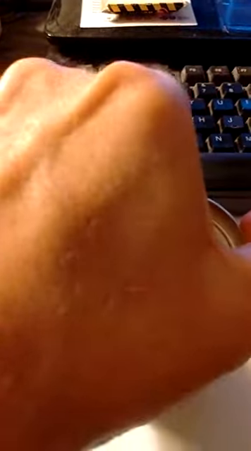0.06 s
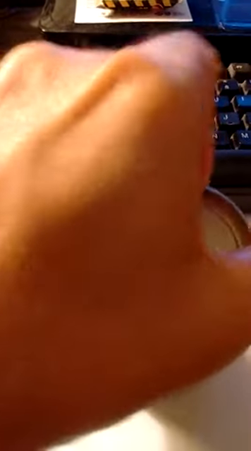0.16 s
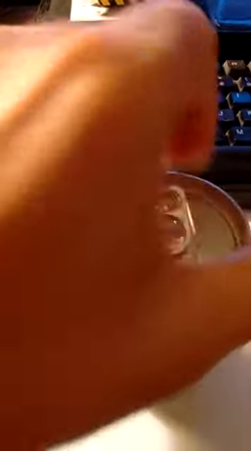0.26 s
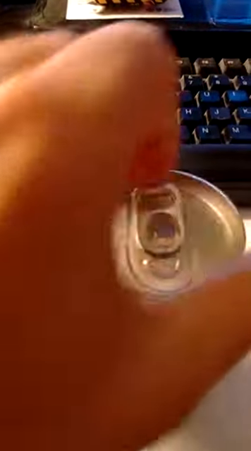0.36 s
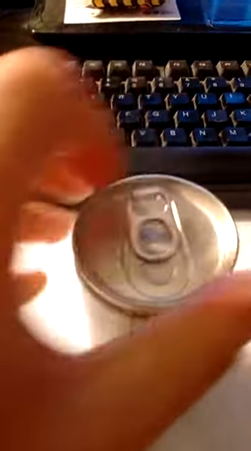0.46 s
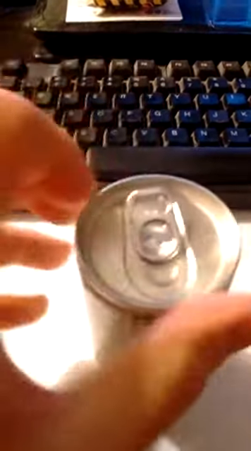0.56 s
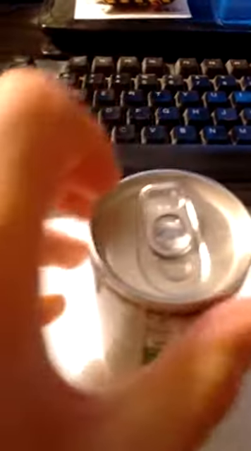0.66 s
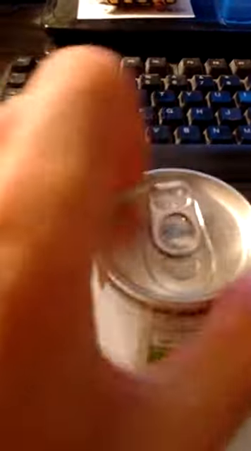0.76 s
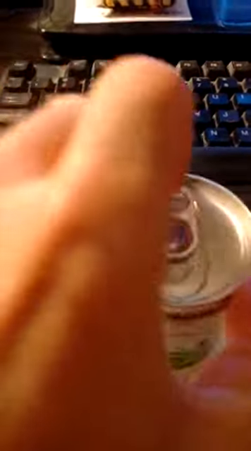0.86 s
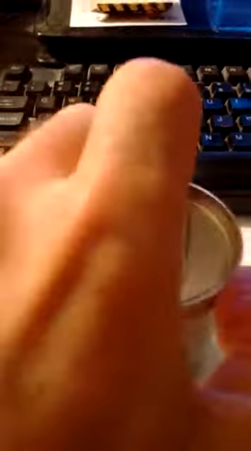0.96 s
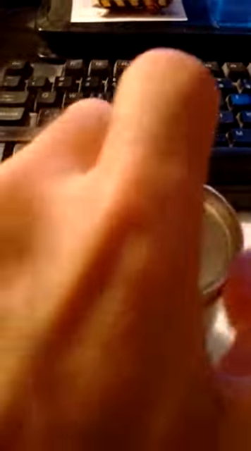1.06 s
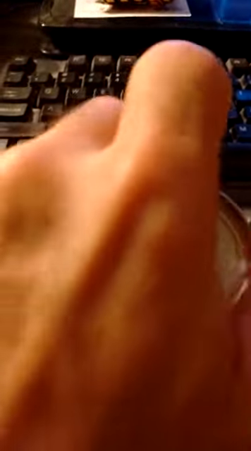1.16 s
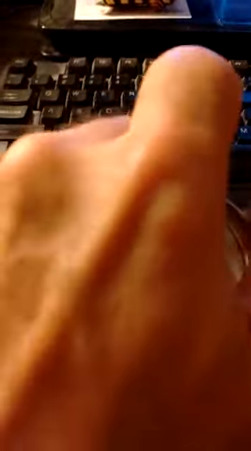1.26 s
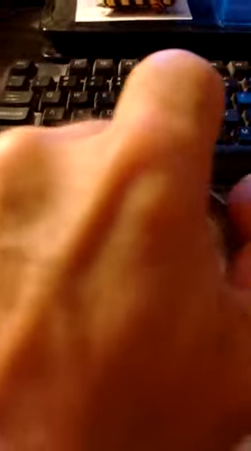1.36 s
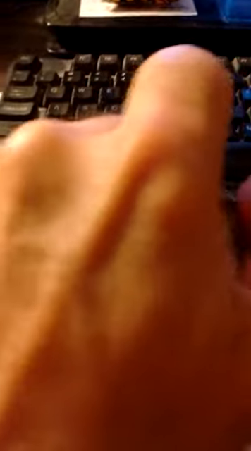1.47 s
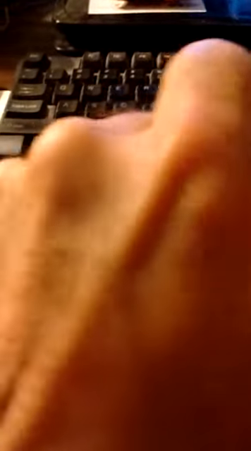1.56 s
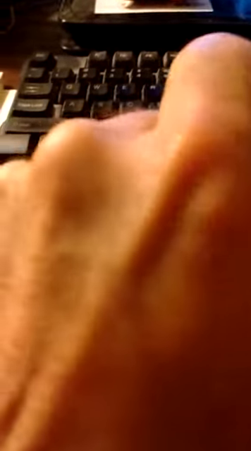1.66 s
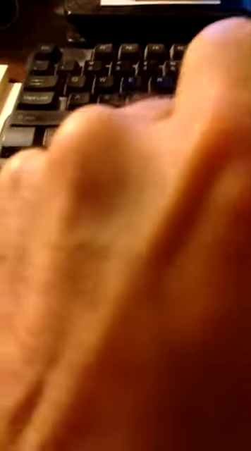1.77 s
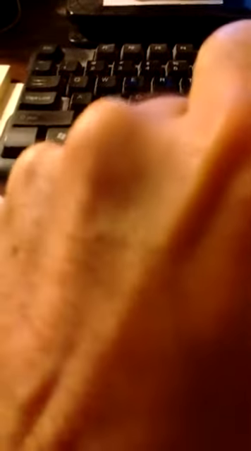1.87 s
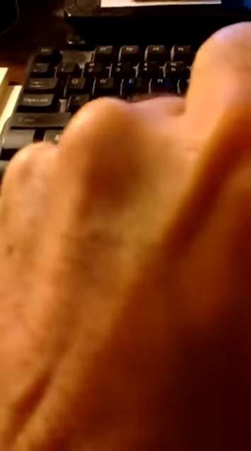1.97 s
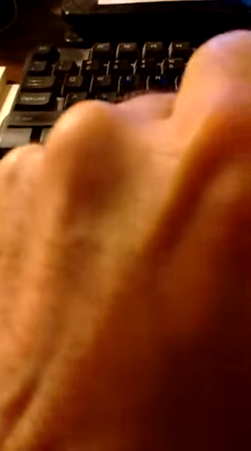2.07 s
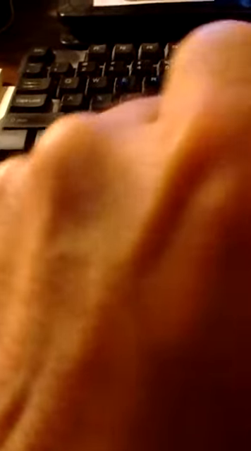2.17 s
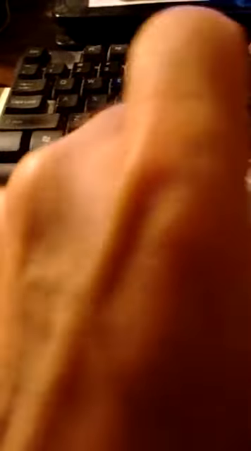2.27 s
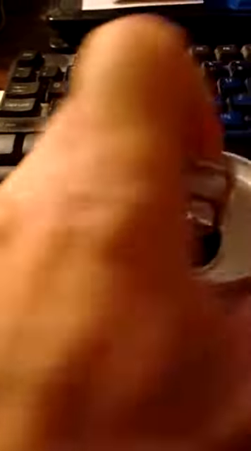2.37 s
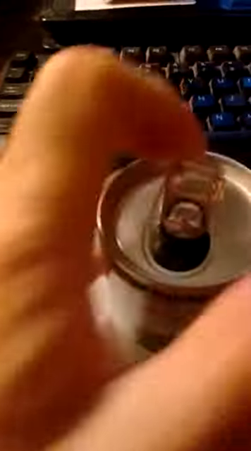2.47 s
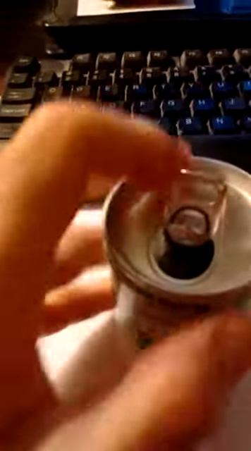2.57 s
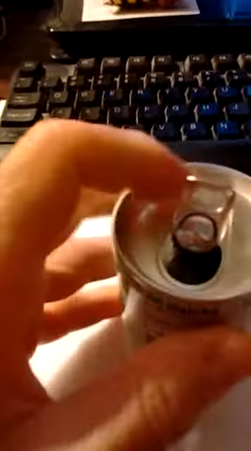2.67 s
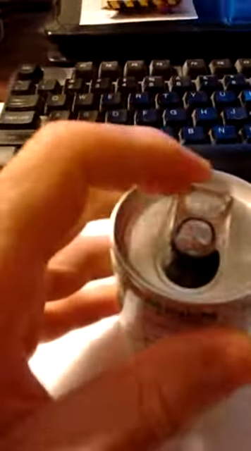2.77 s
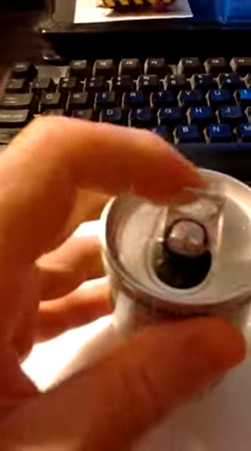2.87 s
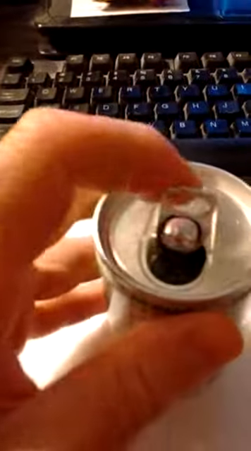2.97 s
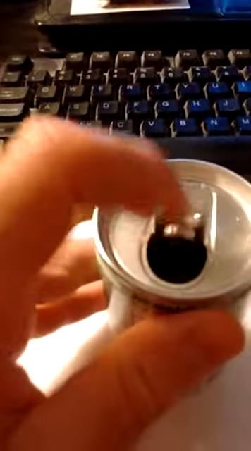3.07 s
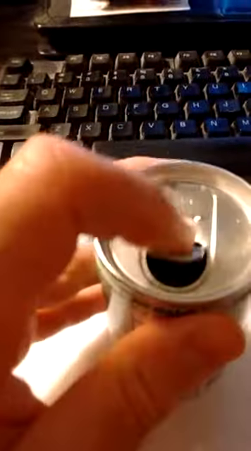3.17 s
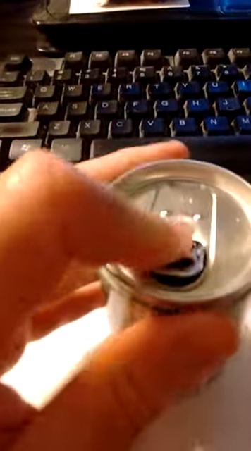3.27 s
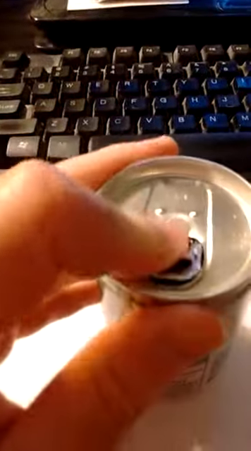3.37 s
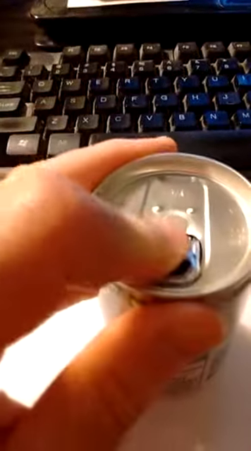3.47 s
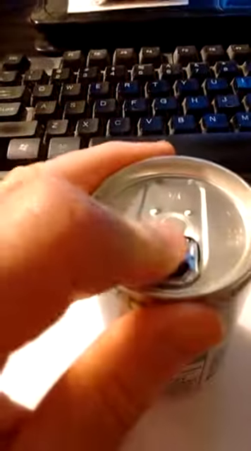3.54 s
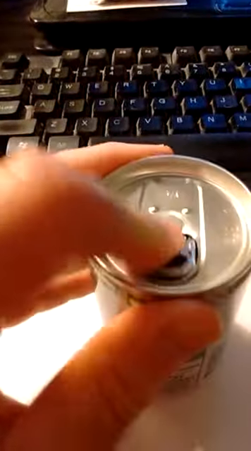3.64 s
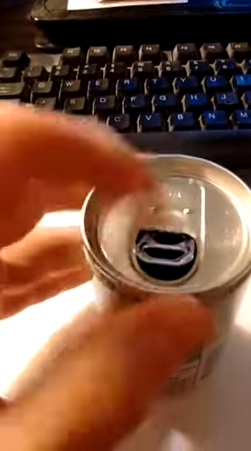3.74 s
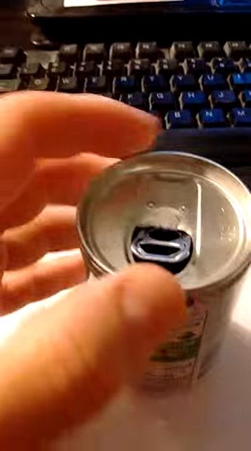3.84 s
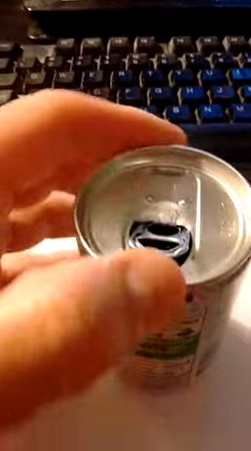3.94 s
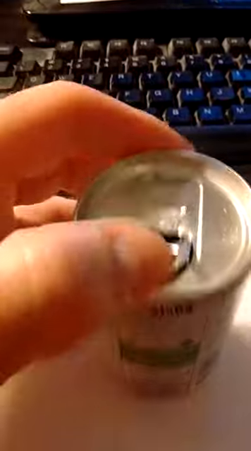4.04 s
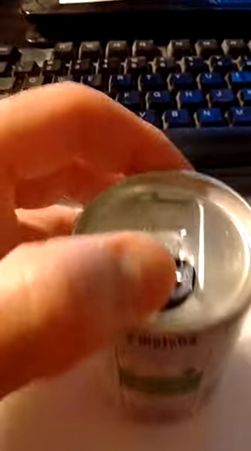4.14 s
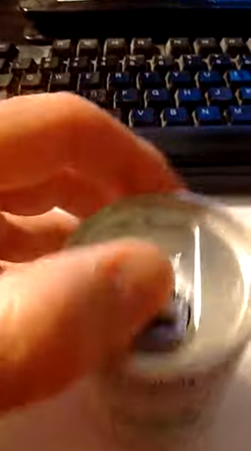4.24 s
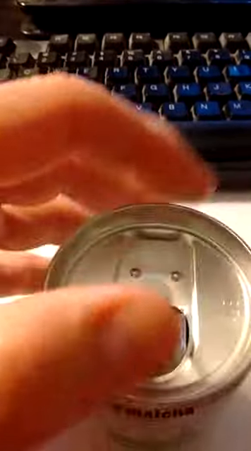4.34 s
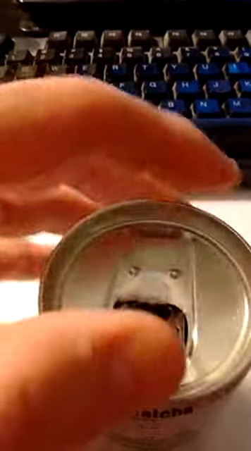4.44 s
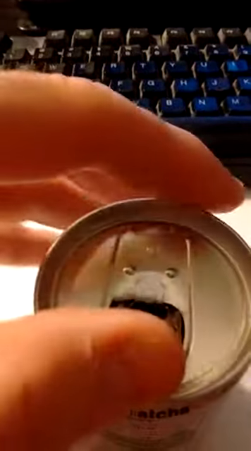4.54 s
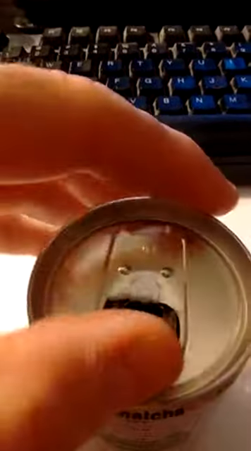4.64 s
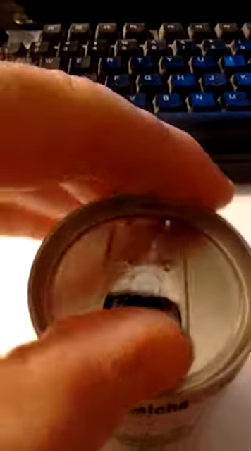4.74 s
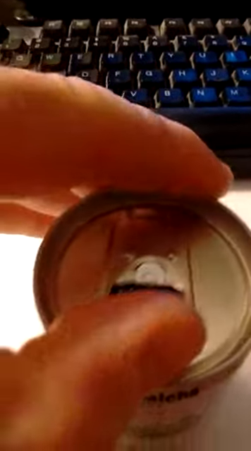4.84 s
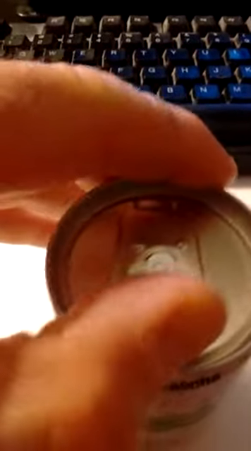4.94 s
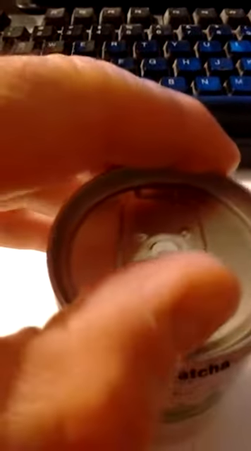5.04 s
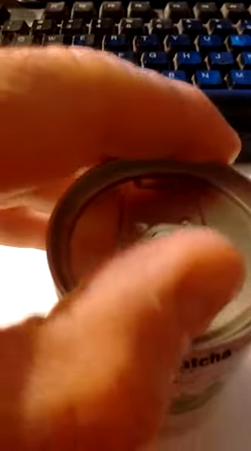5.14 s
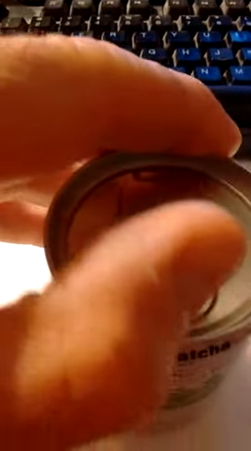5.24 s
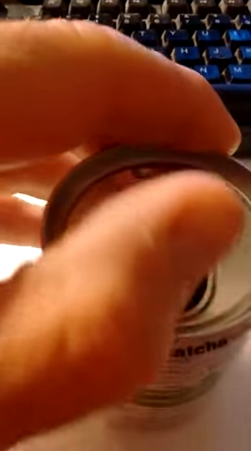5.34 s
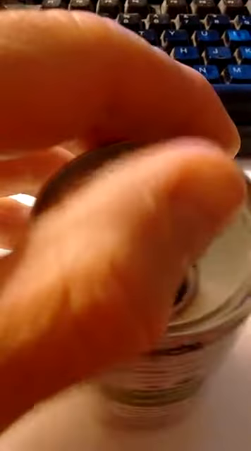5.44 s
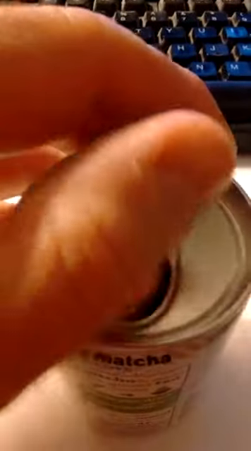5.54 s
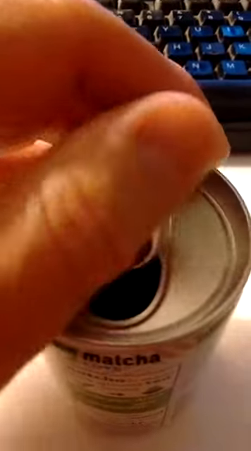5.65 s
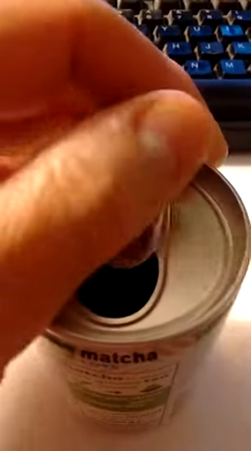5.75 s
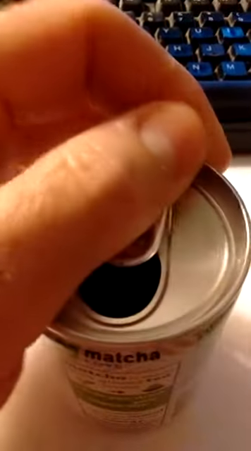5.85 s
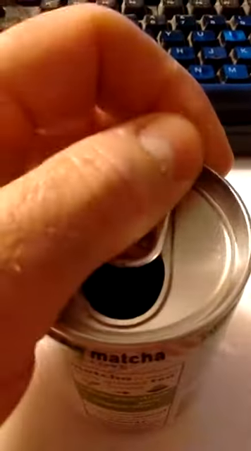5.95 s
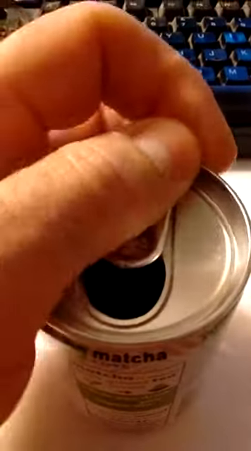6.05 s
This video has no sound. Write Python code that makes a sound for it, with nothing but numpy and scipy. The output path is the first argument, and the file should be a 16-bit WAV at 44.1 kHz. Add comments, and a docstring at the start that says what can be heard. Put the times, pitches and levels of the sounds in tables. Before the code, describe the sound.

Fingers fumble on an aluminium can with faint rubs, rim swipes and small clicks. A tiny creak leads into a sharp metallic snap with a dull pop, far louder than everything else. Light tab creaks follow, then a ping, a solid can thud with a short ringing drag, and a final scraping click. Very close phone pickup, little echo, low rumble and faint fan whine beneath, ducked after the snap.

```python
"""Skin rubs and nails tick on a small aluminium can, close by, over quiet room noise and a faint fan whine.
The lid snaps open, the can is set down and dragged, and the tab is bent flat and back.
Blows and slips ring decaying modes plus a noise crack; strokes are showers of slips coloured by a spectrum.
A phone's gain control ducks at the snap, and the room noise swells back over three seconds."""
import sys
import numpy as np
from scipy import signal
from scipy.fft import rfft, irfft, next_fast_len
from scipy.io import wavfile
from scipy.ndimage import uniform_filter1d, minimum_filter1d, map_coordinates

SR = 44100
rng = np.random.default_rng(int(sys.argv[2]) if len(sys.argv) > 2 else 0)


def file_out(sig):
    """Save sig as 16-bit WAV at sys.argv[1]."""
    # one column per channel
    cols = np.atleast_2d(sig).T
    # limit, then scale
    lim = np.clip(cols, -1, 1)
    pcm = np.round(lim * 32767).astype(np.int16)
    wavfile.write(sys.argv[1], SR, pcm)


N = 269406

# Fractures of the scored lid. Each row: start in seconds, relative peak in dB, tilt in dB per octave.
FRACTURES = [(2.0673, 2.5, 0), (2.06817, 1, 3), (2.0704, -9.5, 2.5)]
# Modes of the lid under the hand. Each row: frequency in Hz, relative level in dB, t60 in s before damping.
LID_MODES = [(1135, -6, 0.02), (1665, 5.5, 0.0063), (1803, 2.5, 0.015), (2330, 4, 0.0099),
             (2590, 3, 0.0094), (3030, -4, 0.018), (3960, -8.5, .012), (4490, -7, 0.0078),
             (4390, -2, 0.015), (5044, -13, 0.015), (6520, -20, 0.0057), (8253, -13.5, 0.013),
             (10630, -20, .008), (12200, -26, 0.01), (15110, -30, 0.0063)]
# Modes of the full can on the desk. Each row: frequency in Hz, relative level in dB, t60 in s before damping.
CAN_MODES = [(102, 0, .17), (170, -5, .12), (240, 7, 0.19), (330, -12, .08), (540, -14, .1), (715, -6, .06),
             (830, -4, 0.06), (1110, -10, .05), (1300, -9, .035), (1660, 0, .045), (1885, 2, .055)]


def amp(db):
    """Decibels to gain."""
    return 10 ** (np.asarray(db) / 20)


def unit(x):
    """x at rms 1."""
    return x / np.sqrt(np.mean(x ** 2) + 1e-20)


def along(points, hz):
    """(Hz, value) points read on a log frequency axis."""
    point_hz, values = np.transpose(points)
    return np.interp(np.log(hz + 1), np.log(point_hz + 1), values)


def wobble(knots_per_s, size=N):
    """A smooth random curve through normally distributed knots."""
    knots = rng.standard_normal(int(size * knots_per_s / SR) + 4)
    return map_coordinates(knots, [np.arange(size) * knots_per_s / SR])


def filtered(x, response):
    """x times a response of frequency in Hz."""
    n = x.shape[-1]
    padded = next_fast_len(n + 8192)
    spectrum = rfft(x, padded) * response(np.fft.rfftfreq(padded, 1 / SR))
    return irfft(spectrum, padded)[..., :n]


def slope(hz, tilt_db):
    """Gain of a tilt in dB per octave about 2 kHz, limited to -12..6 and flat beyond 200..9000 Hz."""
    octaves = np.log2(np.clip(hz, 200, 9000) / 2000)
    return amp(np.clip(tilt_db, -12, 6) * octaves)


def add(track, start_s, sound):
    """Mix a sound into a track."""
    part = track[round(start_s * SR):][:len(sound)]
    part += sound[:len(part)]


def ring(modes, tilt_db, scatter_db, damping, attack_s, crack_db, crack_t60_s):
    """One blow at peak 1: decaying strong modes, and a noise crack for the many weak ones between them."""
    hz, db, t60_s = np.transpose(modes)[:, :, None]
    t = np.arange(SR // 5) / SR
    size = amp(db + scatter_db * rng.standard_normal(hz.shape)) * slope(hz, tilt_db)
    sense = (-1) ** np.arange(len(hz))[:, None]  # neighbouring modes swing in opposite senses
    decay = amp(-60 * t * damping / t60_s)
    tones = np.sum(sense * size * decay * np.sin(2 * np.pi * hz * t), axis=0)

    def crack_response(f):
        span = 1 / (1 + (f / hz.max()) ** 4) / (1 + (hz.min() / (f + 1)) ** 4)
        return amp(along(np.array(modes)[:, :2], f)) * slope(f, tilt_db) * span

    crack = filtered(rng.standard_normal(len(t)), crack_response) * amp(-60 * t / crack_t60_s)
    x = (unit(tones) + amp(crack_db) * unit(crack)) * (1 - np.exp(-t / attack_s))
    return x / np.abs(x).max()


def blows(events, modes, scatter_db, damping, attack_s, crack_db, crack_t60_s):
    """Every contact rings the modes at new strengths."""
    track = np.zeros(N)
    for start_s, peak_db, tilt_db in events:
        blow = ring(modes, tilt_db, scatter_db, damping, attack_s, crack_db, crack_t60_s)
        add(track, start_s, amp(peak_db) * blow)
    return track


def strokes(rows, attack_s, release_s):
    """Each stroke swells, holds and dies away: its (s, dB) outline and its tilt."""
    depth_db = 40
    gestures = []
    for start_s, hold_s, db, tilt_db in rows:
        end_s = start_s + hold_s
        rise = [(start_s - attack_s, db - depth_db), (start_s, db)]
        fall = [(end_s, db), (end_s + release_s, db - depth_db)]
        gestures.append((rise + fall, tilt_db))
    return gestures


def friction(gestures, colour, slips_per_s, smooth, uneven_db, ring_t60_s, ring_db):
    """Tiny slips under uneven pressure ring the thin wall differently from spot to spot."""
    spots_per_s = 24.5
    track, t = np.zeros(N), np.arange(SR // 2) / SR
    wall_t = np.arange(SR // 20) / SR
    for outline, tilt_db in gestures:
        times_s, levels_db = np.transpose(outline)
        start_s = max(times_s[0], 0)
        slips = (rng.random(len(t)) < slips_per_s / SR) * rng.standard_normal(len(t))
        pressure = amp(uneven_db * wobble(107.6, len(t)))
        grain = (unit(slips) + smooth * rng.standard_normal(len(t))) * pressure
        walls = rng.standard_normal((2, len(wall_t))) * amp(-60 * wall_t / ring_t60_s)
        here, there = [signal.fftconvolve(grain, wall / np.linalg.norm(wall))[:len(t)] for wall in walls]
        spot = wobble(spots_per_s, len(t))
        grain = grain + amp(ring_db) * (np.cos(spot) * here + np.sin(spot) * there)
        sound = unit(filtered(grain, lambda hz: amp(along(colour, hz)) * slope(hz, tilt_db)))
        level = amp(np.interp(start_s + t, times_s, levels_db)) * (start_s + t < times_s[-1])
        add(track, start_s, sound * level)
    return track


def can():
    """All that the hand does to the can."""
    return snap() + ticks() + pings() + knocks() + swipes() + rubs() + slides() + bends()


def snap():
    """Fractures share the energy stored in the bent lid; the flap drops and the can is jolted."""
    # Dull pop of the air under the lid. Each row: frequency in Hz, level in dB, t60 in s.
    pop_modes = [(152, 8.5, .05), (494, 2, 0.027)]
    # Wall shimmer of countless weak modes. Each row: frequency in Hz, relative level in dB per Hz.
    wall_colour = [(300, -24.5), (800, -16), (1100, 2.5), (1600, -3.5), (2300, -7), (2800, -3), (3600, -7),
                   (4600, -12), (5600, -10), (7600, -15), (10000, -22), (15000, -28)]
    tear_rms_db, jolt_peak_db, jolt_tilt_db = -12, 0, -3
    shimmer_db, shimmer_t60_s = -4.5, .08
    start_s, t = FRACTURES[0][0], np.arange(SR // 10) / SR
    tear = blows(FRACTURES, LID_MODES, scatter_db=0, damping=1, attack_s=.0004, crack_db=-4, crack_t60_s=.022)
    body = blows([(start_s, jolt_peak_db, jolt_tilt_db)], CAN_MODES, scatter_db=.5, damping=0.98,
                 attack_s=.001, crack_db=-2.0, crack_t60_s=0.062)
    for hz, db, t60_s in pop_modes:
        add(body, start_s, amp(db - 60 * t / t60_s) * np.sin(2 * np.pi * hz * t))
    shimmer = unit(filtered(rng.standard_normal(len(t)), lambda hz: amp(along(wall_colour, hz))))
    add(body, start_s, amp(shimmer_db - 60 * t / shimmer_t60_s) * shimmer)
    return amp(tear_rms_db) * unit(tear) + body  # tear rms is over the whole track


def ticks():
    """Nail and tab click on the lid; creaks and crackle excite the same modes."""
    # Single clicks. Each row: start in seconds, peak in dB, tilt in dB per octave.
    clicks = [(.2756, -27.5, 6), (.395, -29, -13), (.8472, -21, 10), (1.0183, -27.5, 5), (1.2232, -30, -5),
              (1.2868, -38, 6), (1.356, -17, 0), (1.6795, -31, 1), (1.685, -31, 6), (1.8195, -33.5, 4),
              (2.037, -33, 5), (2.0585, -12.5, -3.5), (3.5065, -28, -15), (5.0618, -29, -9.5),
              (5.2057, -30, -15), (5.4515, -28, -11), (5.5158, -16, 3.5)]
    events = clicks + creaks() + crackle(count=8)
    return blows(events, LID_MODES, scatter_db=3, damping=1.5, attack_s=.0002, crack_db=-.5, crack_t60_s=.007)


def creaks():
    """The strained tab sticks and slips at an even pace, harder each time: (s, peak dB, tilt) of every slip."""
    # Runs of slips. Each row: first slip in seconds, gap in s, count, peak of the first slip in dB.
    runs = [(1.35, .017, 2, -25.5), (1.8964, .014, 2, -31), (1.9844, .018, 2, -31.5),
            (3.0746, .011, 3, -26.5), (3.138, .011, 3, -32.5), (5.2, .0184, 3, -27.5),
            (5.3582, .012, 2, -20)]
    slip_grows_db = 1.5
    sealed_tilt_db, open_tilt_db = -1, -13.5  # per octave: the lid is duller once slack
    opened_s = FRACTURES[0][0]
    slips = []
    for start_s, gap_s, count, peak_db in runs:
        tilt_db = sealed_tilt_db if start_s < opened_s else open_tilt_db
        for k in range(round(count)):
            slips.append((start_s + k * gap_s, peak_db + k * slip_grows_db, tilt_db))
    return slips


def crackle(count):
    """Faint slips at random moments, count per strain of the tab: (s, peak dB, tilt)."""
    # Fingers working at the tab. Each row: start in seconds, end in seconds.
    strains = [(1.801, 2.05), (5.829, 6.1)]
    mean_db, spread_db, tilt_db = -38.5, 3.5, -1
    return [(rng.uniform(start_s, end_s), rng.normal(mean_db, spread_db), tilt_db)
            for start_s, end_s in strains for _ in range(count)]


def pings():
    """The loose tab pings on the rim; the struck spot weakens the modes far from its favoured frequency."""
    # Strikes. Each row: start in seconds, peak in dB, favoured frequency in Hz.
    strikes = [(3.7575, -25.5, 3950), (3.757, -22, 1300), (3.7636, -18.5, 1300), (4.2558, -10.5, 2730),
               (4.383, -43, 1300), (4.404, -32, 3950), (4.4955, -29.5, 3950)]
    # Modes of the tab. Each row: frequency in Hz, level in dB before weakening, t60 in s before damping.
    tab_modes = [(1297, 5, 0.022), (1863, -15, .016), (2733, 6.5, 0.034), (3920, -3, 0.032),
                 (5420, -12, .03), (7470, -8, .018)]
    loss_db = 10  # per octave away from the favoured frequency
    track = np.zeros(N)
    for start_s, peak_db, spot_hz in strikes:
        modes = [(hz, db - loss_db * abs(np.log2(hz / spot_hz)), t60_s) for hz, db, t60_s in tab_modes]
        track += blows([(start_s, peak_db, 0)], modes, scatter_db=2, damping=0.82,
                       attack_s=.0005, crack_db=-11.5, crack_t60_s=.008)
    return track


def knocks():
    """The whole can rings and rocks back once; a soft fingertip leaves its upper modes still."""
    # Blows from fingers and desk. Each row: start in seconds, peak in dB, tilt in dB per octave,
    # highest frequency that the contact excites in Hz.
    contacts = [(0.277, -30.5, 6, 3000), (.851, -14.5, 0, 990), (1.019, -20.5, 1.5, 2500),
                (1.67, -25.5, -.5, 900), (4.124, -23.5, 6, 3000), (4.1371, -3, -.5, 3000),
                (4.583, -27, 5.5, 2980)]
    rebound_s, rebound_loss_db = 0.0039, 11.5
    track = np.zeros(N)
    for start_s, peak_db, tilt_db, top_hz in contacts:
        modes = [(hz, db - 10 * np.log10(1 + (hz / top_hz) ** 8), t60_s) for hz, db, t60_s in CAN_MODES]
        pair = [(start_s, peak_db, tilt_db), (start_s + rebound_s, peak_db - rebound_loss_db, tilt_db)]
        track += blows(pair, modes, scatter_db=1.5, damping=1, attack_s=.001, crack_db=-10, crack_t60_s=.11)
    return track


def swipes():
    """A fingertip glides along the rim: dense slips with a steady noise part."""
    # Glides. Each row: start of hold in seconds, hold in s, level in dB, tilt in dB per octave.
    glides = [(.399, 0.089, -41, 3), (.868, 0.064, -32, 0), (.94, 0.037, -32, -2.5),
              (1.206, 0.023, -37, 0.5)]
    # Friction colour. Each row: frequency in Hz, relative level in dB per Hz.
    rim_colour = [(240, 10), (500, -14), (800, -4), (1150, 1.5), (1600, -9), (2100, -10), (3300, -7),
                  (3850, -8.5), (4450, -0.5), (5100, -17), (6800, -13), (7450, -14), (8200, -24),
                  (9300, -3.5), (10500, -35), (15000, -35)]
    gestures = strokes(glides, attack_s=0.016, release_s=0.057)
    return friction(gestures, rim_colour, slips_per_s=6000, smooth=1, uneven_db=1, ring_t60_s=.01, ring_db=-10)


def rubs():
    """Dry skin strokes the can: sparser, more uneven slips."""
    # Strokes. Each row: start of hold in seconds, hold in s, level in dB, tilt in dB per octave.
    skin_strokes = [(.185, 0.031, -31.5, 0.5), (.25, 0.044, -37.5, -2.5), (1.288, .003, -38, 1),
                    (1.68, 0.011, -36, 0), (1.712, 0.036, -35.5, 0.5), (1.752, 0.012, -31, 0.5),
                    (2.305, .044, -42.5, 1.5), (3.83, 0.032, -50.5, 6), (4.76, 0.0096, -52.5, 7),
                    (4.952, 0.019, -49.5, 6)]
    # Friction colour. Each row: frequency in Hz, relative level in dB per Hz.
    skin_colour = [(100, -6.5), (250, -13.5), (500, -51), (1100, -20), (1900, -24), (3000, -24),
                   (4000, -27), (5450, -26), (6500, -37.5), (8500, -33), (10800, -40.5), (15000, -52)]
    gestures = strokes(skin_strokes, attack_s=0.035, release_s=0.07)
    return friction(gestures, skin_colour, slips_per_s=1400, smooth=.4, uneven_db=1.8,
                    ring_t60_s=.012, ring_db=-3)


def slides():
    """Metal slides, tab on lid and can on desk, ringing the wall as it slips."""
    # Short slides. Each row: start of hold in seconds, hold in s, level in dB, tilt in dB per octave.
    short_slides = [(3.756, .012, -35.5, 0.5), (4.119, 0.011, -32.5, 3.5), (4.496, 0.0045, -37, -4),
                    (4.604, 0.028, -34, -3)]
    # Can dragged over the desk. Each row: time in seconds, level in dB before drag_db.
    drag = [(4.16, -62), (4.2, -53), (4.218, -42), (4.232, -31), (4.244, -36.5), (4.256, -35), (4.268, -40),
            (4.308, -42.5), (4.325, -56.5), (4.346, -46.5), (4.4, -49.5), (4.425, -80)]
    # Friction colour. Each row: frequency in Hz, relative level in dB per Hz.
    slide_colour = [(120, -8), (250, -7), (500, -37), (1050, -5.5), (1350, -10), (1750, -1), (2200, -8),
                    (2720, 3), (3200, -4.5), (3900, -8), (4800, -21.5), (6300, -8.5), (7100, -23),
                    (8400, -10), (9500, -21.5), (12000, -32.5), (15000, -31)]
    drag_db, drag_tilt_db = 13, 0.5
    gestures = strokes(short_slides, attack_s=0.008, release_s=0.046)
    gestures.append(([(s, db + drag_db) for s, db in drag], drag_tilt_db))
    return friction(gestures, slide_colour, slips_per_s=2800, smooth=.55, uneven_db=1,
                    ring_t60_s=.02, ring_db=-5)


def bends():
    """The tab grates lightly round its rivet and is levered back upright."""
    # Grating. Each row: start of hold in seconds, hold in s, level in dB, tilt in dB per octave.
    grates = [(3.085, 0.024, -39, -0.5), (3.135, 0.017, -37, -2), (4.74, 0.011, -46.5, -7),
              (5.195, 0.01, -39.5, -8), (5.88, 0.079, -44, -2)]
    # Tab levered upright. Each row: time in seconds, level in dB before lever_db.
    lever = [(5.385, -58), (5.41, -42), (5.44, -35), (5.482, -25.5), (5.499, -25.5), (5.512, -30),
             (5.518, -24.5), (5.528, -39), (5.547, -38), (5.58, -67)]
    # Friction colour. Each row: frequency in Hz, relative level in dB per Hz.
    bend_colour = [(200, -30), (750, -35), (1050, -7), (1350, 1.5), (1800, 0), (2100, -7), (2700, -6.5),
                   (3800, -9.5), (4900, -29.5), (6100, -12.5), (8000, -30.5), (9800, -18.5), (12000, -41),
                   (15000, -32)]
    lever_db, lever_tilt_db = 1, -1.5
    gestures = strokes(grates, attack_s=0.04, release_s=0.067)
    gestures.append(([(s, db + lever_db) for s, db in lever], lever_tilt_db))
    return friction(gestures, bend_colour, slips_per_s=3000, smooth=1, uneven_db=1.2,
                    ring_t60_s=.01, ring_db=-10)


def room(x):
    """The walls answer each microphone with its own short decaying noise tail."""
    # Room decay. Each row: frequency in Hz, t60 in s.
    room_decay = [(150, .16), (1200, .23), (2500, .19), (4500, .18), (8500, .17), (13000, .14)]
    hz, t, bins = signal.stft(rng.standard_normal((2, SR // 2)), SR, nperseg=256)
    decay = amp(-60 * t / along(room_decay, hz)[:, None])
    tail = signal.istft(bins * decay, SR, nperseg=256)[1]
    tail = np.pad(tail / np.linalg.norm(tail[0]), ((0, 0), (SR // 250, 0)))  # 4 ms pre-delay
    return signal.fftconvolve(x[None], tail, axes=1)[:, :N]


def background():
    """Steady rumble and air noise, with a low hum and a slightly unsteady fan whine."""
    # Room noise. Each row: frequency in Hz, relative level in dB per Hz.
    air_colour = [(25, -9), (55, 3), (85, -10.5), (120, -1.5), (250, -9), (400, -9.5), (800, -21),
                  (1050, -20), (1800, -23), (2600, -30.5), (4800, -37.5), (6500, -43), (9000, -36.5),
                  (15000, -46)]
    # Left-right likeness of the noise. Each row: frequency in Hz, coherence.
    likeness = [(500, 0.98), (850, 0.59), (1400, 0.46), (2500, 0.85), (5000, 0.53), (9000, 0.86),
                (13000, 0.073)]
    # Hum and whine tones. Each row: mean frequency in Hz, nominal rms in dB.
    steady_tones = [(56, -49.5), (119, -48.5), (1020, -55.5)]

    def shared_and_opposed(hz):
        turn = np.arccos(np.clip(along(likeness, hz), -1, 1)) / 2
        return amp(along(air_colour, hz)) * [np.cos(turn), np.sin(turn)]

    both, apart = filtered(rng.standard_normal((2, N)), shared_and_opposed)
    air = amp(-37.5) * unit(np.array([both + apart, both - apart]))
    tones = np.zeros(N)
    for hz, rms_db in steady_tones:
        level = amp(rms_db + 1.4 * wobble(4.8)) * np.sqrt(2)
        cycles = np.cumsum(hz + 1.5 * wobble(19)) / SR
        tones += level * np.sin(2 * np.pi * cycles)
    return air + tones


def microphones(pair):
    """The phone's stereo pair: opposite polarity in the bass, the left side leading in the treble."""
    def phase(hz):
        bass = np.pi * (1.5 + .5 * np.tanh((hz - 850) / 130))
        lag_s = .000325
        return bass + 2 * np.pi * lag_s * np.maximum(hz - 1600, 0)
    return filtered(pair, lambda hz: np.array([np.ones_like(hz), np.exp(-1j * phase(hz))]))


def scene():
    """The can, close and a little to the left, in the room."""
    # The left microphone is nearer. Each row: frequency in Hz, left minus right in dB.
    balance = [(200, 1.5), (850, 2), (1300, 2), (2600, 4), (3700, 8.5), (4600, 5), (7000, 4.5), (9800, 3.5),
               (12000, 14.5), (15000, 10)]
    direct = can()
    walls = filtered(room(direct), lambda hz: slope(hz, tilt_db=0.55))
    near = filtered(direct + amp(-22.5) * walls, lambda hz: amp(np.outer([.5, -.5], along(balance, hz))))
    return microphones(near + amp([[.7], [-.7]]) * background())


def gain_control(x, ceiling_db, start_db, hold_s, recovery_db_per_s):
    """Power over the ceiling cuts the gain at once; it waits, then climbs steadily. It starts turned down."""
    t, hold = np.arange(N) / SR, 2 * int(hold_s * SR / 2) + 1
    power = np.abs(uniform_filter1d(np.mean(x ** 2, axis=0), size=176))  # 4 ms mean
    needed_db = np.minimum(0, ceiling_db - 10 * np.log10(power + 1e-12))
    held_db = minimum_filter1d(needed_db, hold, origin=hold // 2)
    held_db[0] = start_db
    climb_db = recovery_db_per_s * t
    gain_db = np.minimum.accumulate(held_db - climb_db) + climb_db
    return x * amp(gain_db)


def record(dry):
    """Gain control, a trace of electronic hiss, clipping at full scale and the band limit."""
    top_hz = 15750
    x = gain_control(dry, ceiling_db=-4.0, start_db=-19.5, hold_s=0.58, recovery_db_per_s=9.0)
    x = np.clip(x + amp(-74.5) * rng.standard_normal((2, N)), -1, 1)
    return filtered(x, lambda hz: np.clip((top_hz - hz) / 200 + .5, 0, 1))


dry = scene()
out = record(dry)
file_out(out)
```